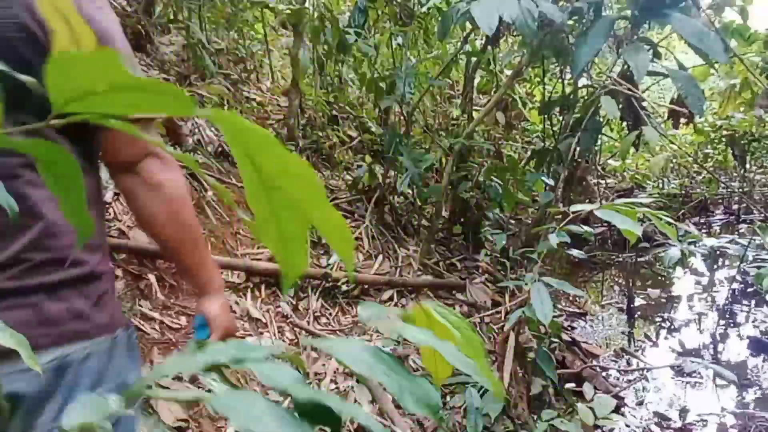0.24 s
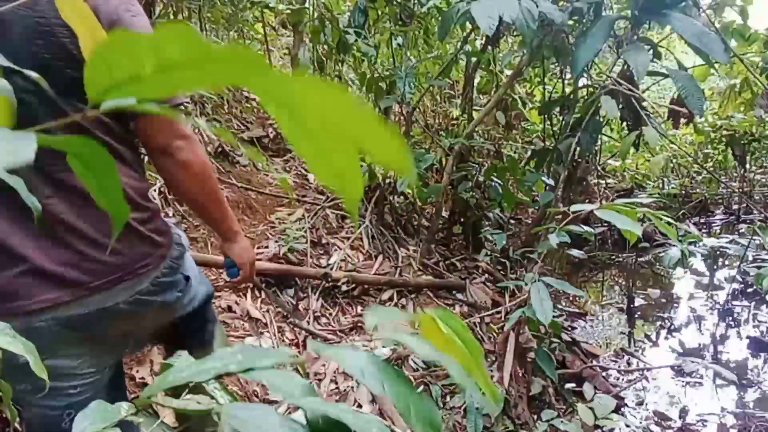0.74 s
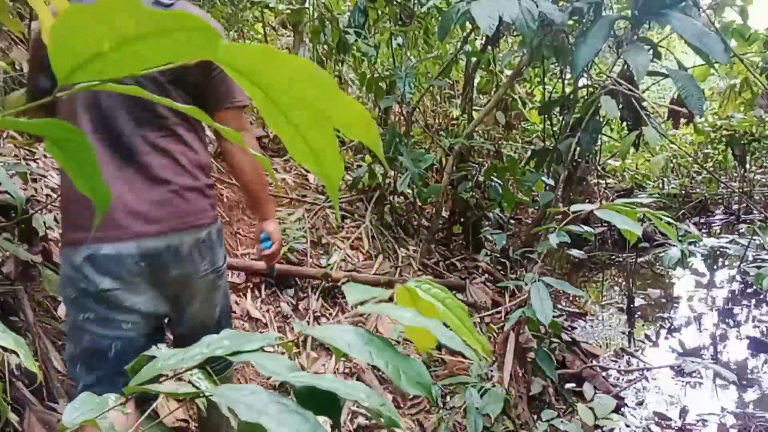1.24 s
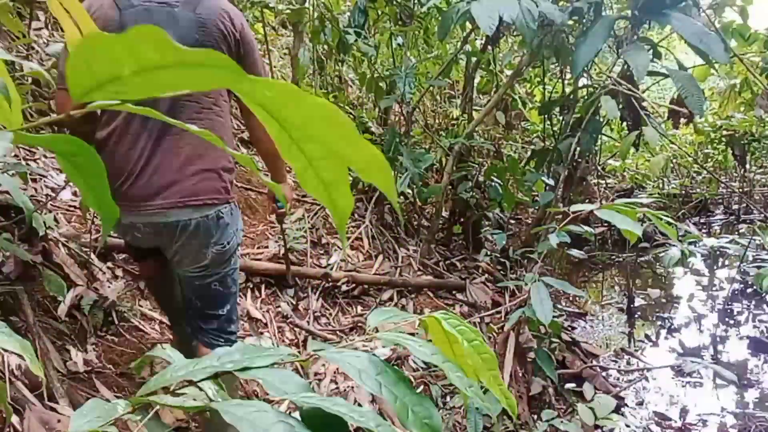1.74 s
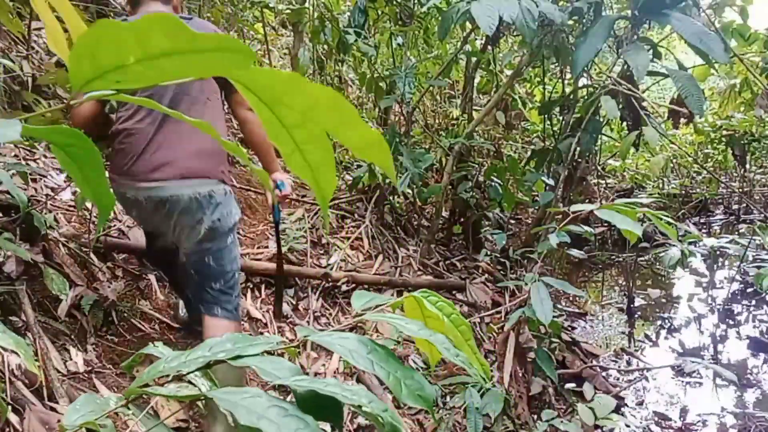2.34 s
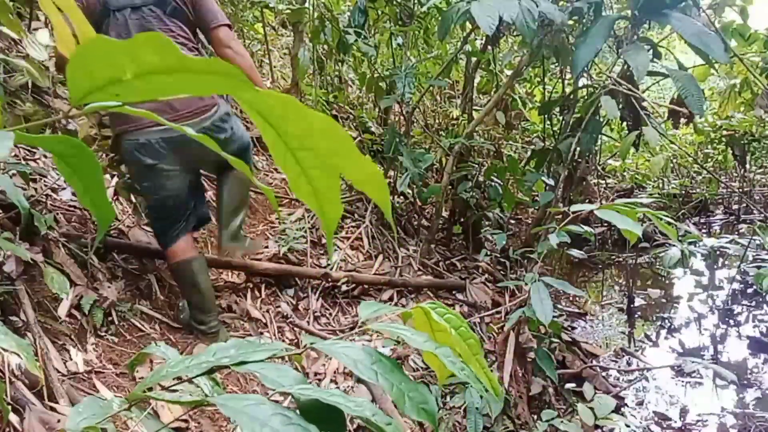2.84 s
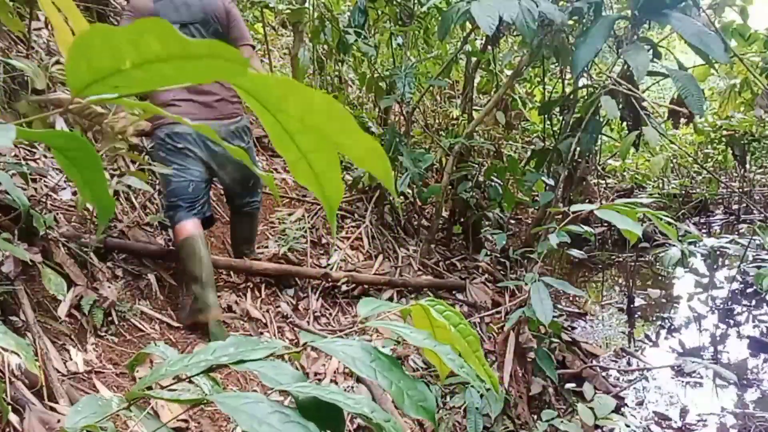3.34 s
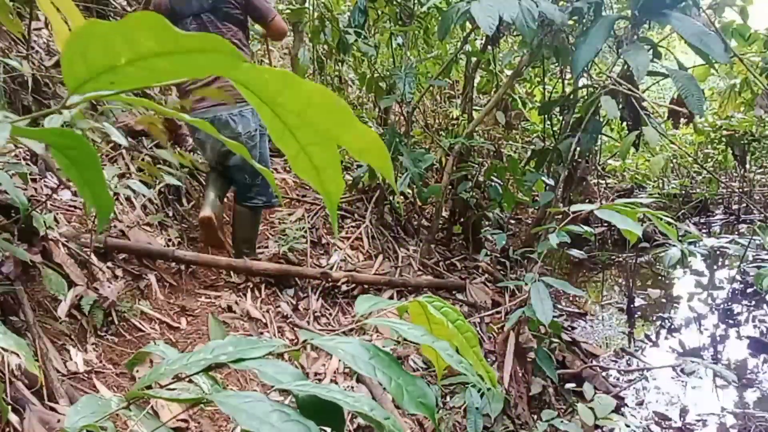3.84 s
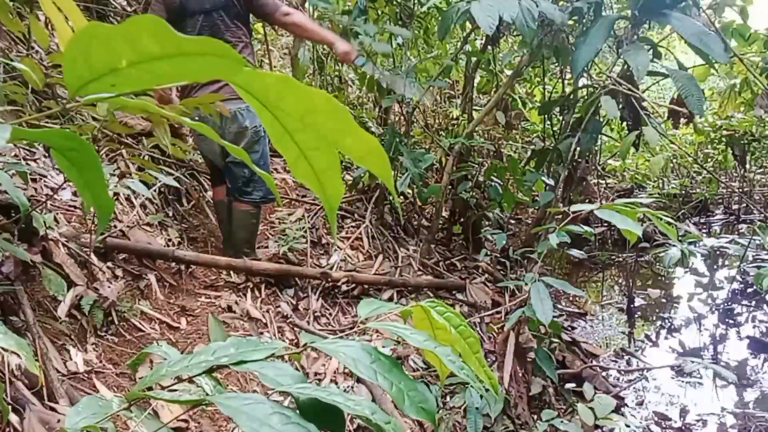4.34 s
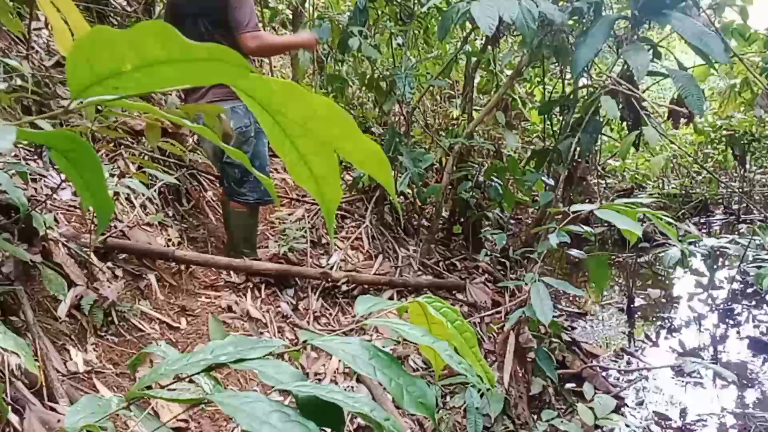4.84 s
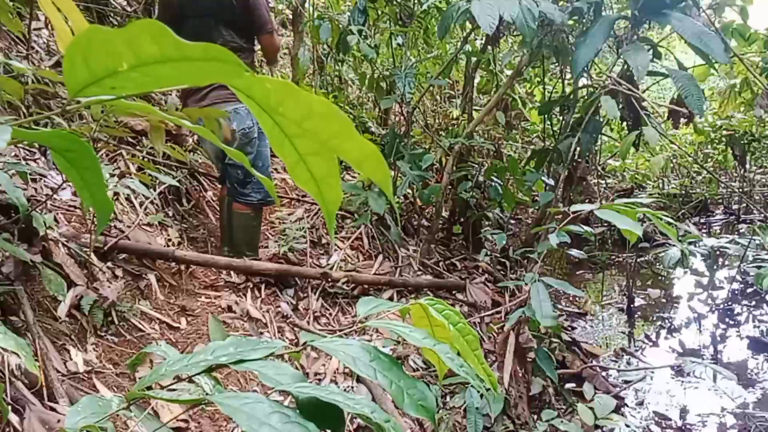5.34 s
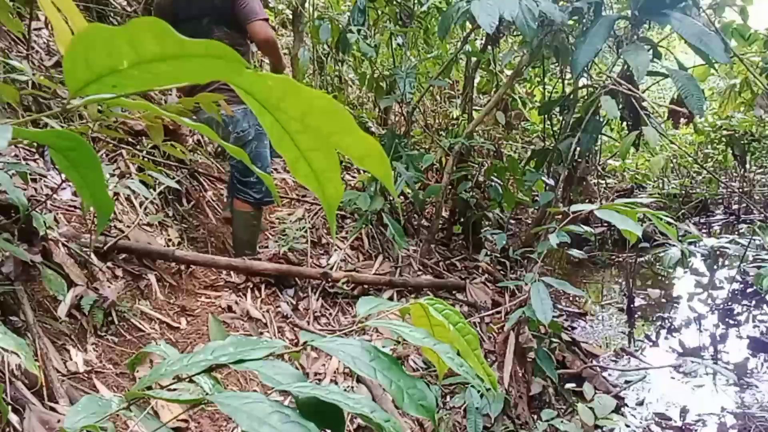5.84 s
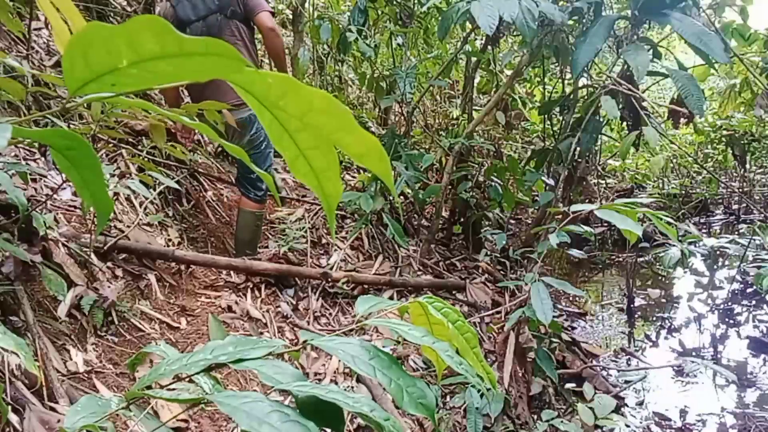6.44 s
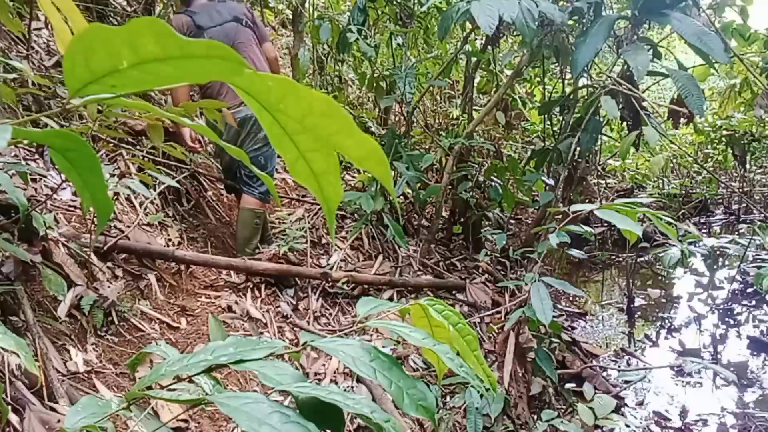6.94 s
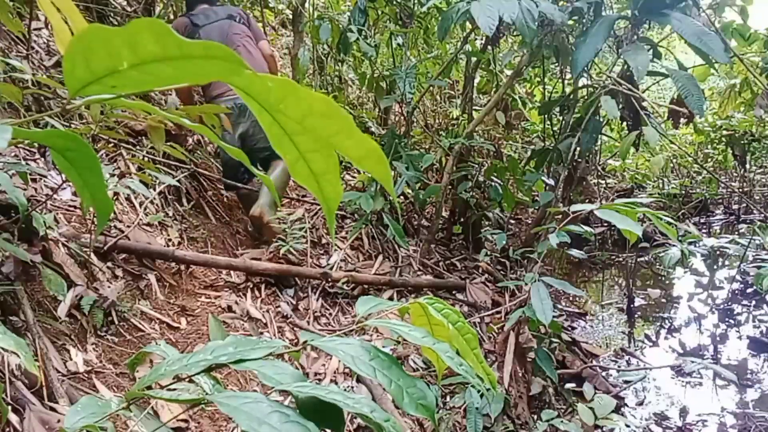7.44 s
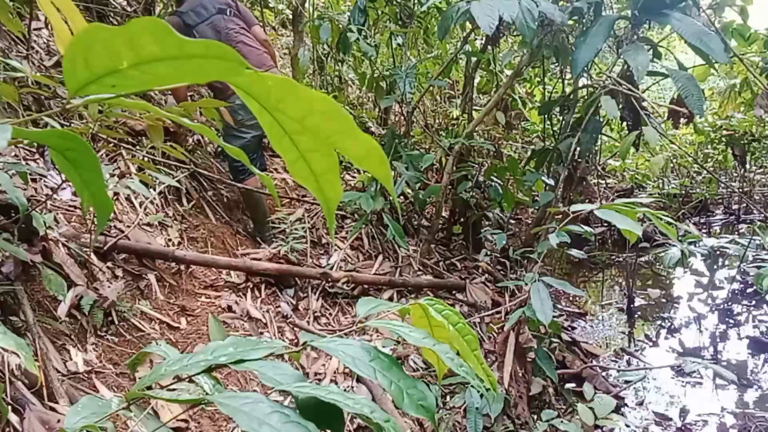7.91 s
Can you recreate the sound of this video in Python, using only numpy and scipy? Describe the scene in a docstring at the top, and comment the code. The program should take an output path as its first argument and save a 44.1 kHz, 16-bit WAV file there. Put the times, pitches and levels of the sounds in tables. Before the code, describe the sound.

Far-off cicadas keep up a high drone in a tropical forest while nearby boots crush dry leaf litter and crack twigs in uneven steps. A long blade tears through the undergrowth twice, first hard, then softer, with a slight echo from the trees. A few more steps crunch as the walker moves away. A dove hoots low and a small bird whistles faintly in the distance.

```python
"""Rainforest floor, one microphone close to a walker in rubber boots who slowly moves off.
Dry leaf litter crackles underfoot, twigs crack and ring, soles thud on damp soil, and a long knife
slashes twice through the brush; the trunks return a faint echo. Far off, over a low wash of air,
a cicada chorus drones near 7.5 kHz, a second insect glides near 5.5 kHz, a dove hoots low
and a small bird whistles twice."""
import sys
import numpy as np
from scipy import signal
from scipy.io import wavfile
from scipy.ndimage import uniform_filter1d

SR = 44100
rng = np.random.default_rng(int(sys.argv[2]) if len(sys.argv) > 2 else 0)


def generate_wav(signal):
    """Clip the signal to [-1, 1] and save it as 16-bit WAV at the path in sys.argv[1]."""
    frames = np.transpose(np.atleast_2d(signal))
    scaled = np.clip(frames, -1, 1) * 32767
    pcm = np.round(scaled).astype(np.int16)
    wavfile.write(sys.argv[1], SR, pcm)


N = 360297
T = np.arange(N) / SR

# Tone of the forest air: frequency_hz, gain_db
AIR_SPECTRUM = [(44, -37.5), (68, 2.5), (123, -0.5), (355, -2.5), (468, -5), (857, -7), (1030, -8.5),
                (4800, -15), (6240, -55.5)]
# Swell of the far cicada chorus: time_s, level_db
CHORUS_LEVELS = [(0.0, -51), (0.34, -56.5), (0.95, -52), (1.21, -57.5), (1.98, -52.5), (4.3, -52.5),
                 (4.46, -50.5), (4.94, -53), (8.17, -54)]
# Tone of that chorus: frequency_hz, gain_db
CHORUS_SPECTRUM = [(3470, -52.5), (5900, -25), (6100, -23), (6450, -19.5), (7160, -4), (7570, 2),
                   (8000, -1), (8570, -14.5), (9490, -19.5), (12300, -53), (13700, -40.5), (14300, -66),
                   (15400, -62)]
# Cicadas nearer the microphone: pitch_hz, width_hz, level_db, swell_rate_hz
NEAR_CICADAS = [(7790, 70, -68, 3.2)]
# Overlapping insect phrases: start_s, end_s, level_db, first_hz, last_hz, width_hz
GLIDE_PHRASES = [(.3, 1.302, -76.5, 5280, 5230, 278), (2.328, 3.03, -69.5, 5070, 5280, 420),
                 (2.97, 3.33, -72.5, 5350, 5430, 300), (6.149, 7.098, -79, 5130, 5250, 200),
                 (7.0, 8.09, -70.5, 5370, 5430, 210), (7.503, 8.087, -70, 5650, 5680, 110),
                 (7.008, 7.259, -72, 9500, 9360, 80)]
# Distant dove: start_s, level_db
DOVE_HOOTS = [(1.67, -78.5), (3.41, -69.5), (5.17, -66), (6.905, -68)]
# Distant small bird: start_s, level_db, pitch_hz, width_hz
BIRD_WHISTLES = [(2.17, -69, 3040, 60), (3.76, -65.5, 2180, 400)]

# Levels of the close sounds below are those ahead of the microphone's colouring.
# Bursts of crushed or brushed leaves: start_s, end_s, dull_db, crisp_db
LEAF_BURSTS = [(0, 0.188, -69.5, -65.5), (0.133, 0.246, -46, -48), (0.317, 0.476, -59, -55),
               (1.022, 1.131, -60, -46), (1.267, 1.399, -63.5, -65), (1.84, 1.925, -73, -54.5),
               (2.282, 2.342, -82, -56.5), (2.817, 2.964, -64.5, -68.5), (3.276, 3.398, -48, -46.5),
               (3.363, 3.52, -57.5, -54), (3.537, 3.738, -65, -59.5), (3.712, 3.873, -65.5, -70.5),
               (3.879, 4.046, -73.5, -62.5), (4.127, 4.162, -55.5, -35.5), (4.767, 4.854, -62, -57.5),
               (4.935, 4.997, -65.5, -50.5), (5.055, 5.176, -58.5, -52), (5.147, 5.443, -60, -57.5),
               (5.676, 5.729, -65, -67), (5.86, 5.962, -79, -63), (6.029, 6.11, -69, -63),
               (6.82, 6.945, -73, -68), (7.281, 7.332, -53.5, -51.5), (7.333, 7.546, -61, -61),
               (7.66, 7.745, -63, -56)]
# Dull crush of packed litter: frequency_hz, gain_db
DULL_SPECTRUM = [(59, -60), (100, -9), (216, -6.5), (446, -5), (3000, -4.5), (3900, -31.5), (6600, -120)]
# Crisp leaf edges: frequency_hz, gain_db
CRISP_SPECTRUM = [(1200, -30.5), (2500, -9), (4000, -4.5), (8000, -4), (14000, -10.5)]
# Breaking twigs: start_s, ring_peak_db, pitch_hz, width_ratio (to pitch), crack_db (against the ring)
TWIG_SNAPS = [(0.112, -49.5, 4700, 0.11, 13.5), (0.15, -33.5, 847, 0.3, -2), (0.167, -35.5, 1710, 0.51, 0),
              (0.191, -36.5, 385, 1.14, -2), (0.337, -31, 1610, 0.65, 4), (0.413, -25, 760, 1.26, -26),
              (0.536, -48.5, 1300, 0.47, -22), (0.597, -42, 1390, 0.24, -7), (0.749, -42, 1820, 0.48, 5.5),
              (1.059, -25.5, 564, 0.52, -19), (1.06, -27.5, 1690, 0.47, -34), (1.101, -39, 1390, 0.32, -14),
              (1.122, -41, 600, 0.57, -20), (1.127, -40, 1330, 0.25, -15), (1.275, -52, 1890, 0.18, -5),
              (1.386, -43, 780, 0.35, -33), (1.583, -49.5, 504, 0.41, -14), (1.63, -52, 1200, 0.33, -16),
              (1.628, -54, 4730, 0.083, 2), (2.365, -41.5, 2150, 0.96, -1), (2.616, -37.5, 580, 0.51, -13),
              (3.261, -44.5, 607, 0.21, -4), (3.302, -22, 544, 0.92, -10), (3.306, -29.5, 1980, 0.24, -20),
              (3.451, -38, 1610, 0.5, 0), (3.554, -33, 5650, 0.24, -18), (3.563, -14.5, 7160, 0.37, -9),
              (3.643, -38.5, 1034, 0.6, -18), (4.133, -33, 1295, 0.19, -19), (4.292, -18.5, 4600, 0.5, 0),
              (4.318, -20.5, 5690, .4, -1), (5.072, -46, 613, 0.12, 13), (5.309, -41, 880, 0.29, -2),
              (5.397, -31.5, 4170, 0.26, -1.5), (5.535, -48, 1750, 0.27, 3), (7.285, -40, 1217, 0.17, -25),
              (7.35, -38.5, 626, 0.32, -20)]
# Modes of a twig, against the first: pitch_ratio, gain_db, width_ratio
TWIG_MODES = [(1, 9, 0.91), (2.0, -3.5, 0.6), (3.2, -17.5, 0.4)]
# Boot on soil: start_s, level_db, pitch_hz
BOOT_THUDS = [(0.146, -46.5, 268), (3.302, -39.5, 240.5), (3.45, -40.5, 218), (4.284, -43, 95)]
# The clearest ticks of stalks: start_s, peak_db, pitch_hz
STALK_TICKS = [(0.268, -55.5, 583), (0.653, -59, 2020), (0.845, -59, 550), (1.208, -56, 1660),
               (1.342, -63, 1640), (1.364, -57, 865), (1.54, -56.5, 840), (1.558, -54, 560),
               (1.712, -60, 1240), (2.339, -61.5, 1720), (2.744, -64, 4080), (3.005, -63.5, 1200),
               (7.351, -41, 1290), (7.414, -59, 970), (7.46, -54, 637)]
# Knife strokes: start_s, deepest_bite_s, level_db
KNIFE_STROKES = [(4.255, 4.296, -18), (5.399, 5.405, -33.5)]
# Brush tearing under the blade: frequency_hz, gain_db
BRUSH_SPECTRUM = [(60, -44), (100, -19), (395, -9.5), (650, -11.5), (1180, -9.5), (4080, -6), (7500, -5),
                  (16000, -12.5)]
# Echo among the trunks: frequency_hz, t60_s
TRUNK_DECAY = [(200, 0.23), (700, 0.45), (1500, 0.55), (4000, 0.66), (9000, 0.24)]
# The microphone's colouring of close sounds: frequency_hz, gain_db
MIC_RESPONSE = [(40, -13.5), (200, -2.5), (400, 1), (7500, 2.5), (8500, 0.5), (10000, -17), (12000, -25),
                (12800, -57), (13700, -30.5), (14600, -58.5)]


def gain_of(db):
    return 10 ** (np.asarray(db) / 20)


def unit_rms(x):
    return x / np.sqrt(np.mean(x ** 2) + 1e-30)


def value_at(points, hz):
    """Reads a table along a logarithmic frequency axis."""
    table_hz, value = np.transpose(points)
    return np.interp(np.log(hz + 1), np.log(table_hz + 1), value)


def gate(start, end, rise_s, fall_s):
    """Envelope from start to end with straight fades."""
    return np.clip(np.minimum((T - start) / rise_s, (end - T) / fall_s), 0, 1)


def coloured(x, spectrum):
    """Causal filter of the given spectrum: the phase follows from the log gain."""
    hz = abs(np.fft.fftfreq(4096, 1 / SR))
    log_gain = np.log(gain_of(np.maximum(value_at(spectrum, hz), -100)))
    taps = np.fft.ifft(np.exp(signal.hilbert(log_gain).conj())).real[:2048]
    return signal.oaconvolve(x, taps)[:len(x)]


def resonate(x, hz, width_hz):
    """A resonance that may move: shifts hz down to zero, smooths, and shifts back."""
    turn = np.exp(2j * np.pi * np.cumsum(hz * np.ones(len(x))) / SR)
    pole = np.exp(-np.pi * width_hz / SR)
    return 2 * (turn * signal.lfilter([1 - pole], [1, -pole], x / turn)).real


def band(x, hz, width_hz):
    """Two passes through one resonance, at rms 1."""
    return unit_rms(resonate(resonate(x, hz, width_hz), hz, width_hz))


def wander(rate_hz):
    """Smooth random drift of rms 1."""
    feedback = [1, -np.exp(-np.pi * rate_hz / SR)]
    drift = signal.lfilter([1], feedback, rng.standard_normal(N))
    return unit_rms(signal.lfilter([1], feedback, drift))


def hiss(spectrum, patchy_db):
    """Shaped noise with louder and softer patches in time and frequency."""
    frames, hz = N // 256 + 5, np.fft.rfftfreq(1024, 1 / SR)
    real, imag, patches = rng.standard_normal((frames, 513, 3)).T
    patches = unit_rms(uniform_filter1d(uniform_filter1d(patches, size=10, axis=0), size=12, axis=1))
    bins = (real + 1j * imag) * gain_of(value_at(spectrum, hz)[:, None] + patchy_db * patches)
    return unit_rms(signal.istft(bins, nperseg=1024, noverlap=768)[1][:N])


def crackle(per_s, spread_db, clump_db):
    """Clumped clicks of random sign; a few are large."""
    clicks = (rng.random(N) < per_s / SR) * rng.choice([-1., 1.], N)
    size = np.minimum(rng.exponential(1, N), 5)
    return clicks * gain_of(spread_db * size + clump_db * wander(29))


def forest_air():
    """A faint, low wash all around the microphone, its level wavering slightly."""
    return gain_of(-74.5 + 0.71 * wander(5.6)) * hiss(AIR_SPECTRUM, patchy_db=1.7)


def cicadas():
    """Many far cicadas blur into a band of hiss; a nearer one is a fuzzy whistle that comes and goes."""
    chorus_db = np.interp(T, *np.transpose(CHORUS_LEVELS)) + 1.6 * wander(2.4)
    out = gain_of(chorus_db) * hiss(CHORUS_SPECTRUM, patchy_db=2.0)
    for hz, width_hz, db, swell_hz in NEAR_CICADAS:
        whistle = band(rng.standard_normal(N), hz, width_hz)
        out += gain_of(db + 8.2 * np.minimum(wander(swell_hz), 1.2)) * whistle
    return out


def leaf_litter(walk_off_db_per_s=-2, shed_db_per_s=-94.5, burst_sag=0.38):
    """Close by, leaves break as dense clicks: dull from packed litter, crisp from the edges."""
    # leaves stir all along, fainter as the walker moves off
    dull, crisp = gain_of(-73 + walk_off_db_per_s * T), gain_of(-71 + walk_off_db_per_s * T)
    for start, bite, db in KNIFE_STROKES:  # cut leaves rain down after each stroke
        shed = gain_of(db - 15 + shed_db_per_s * np.maximum(T - bite, 0))
        crisp += shed * gate(start, N / SR, bite - start, 0.01)
    for start, end, dull_db, crisp_db in LEAF_BURSTS:
        progress = np.clip((T - start) / (end - start), 0, 1)
        burst = gate(start, end, 0.028, 0.062) * (1 - burst_sag * progress)
        dull += gain_of(dull_db) * burst
        crisp += gain_of(crisp_db) * burst
    dull_clicks = coloured(crackle(per_s=5000, spread_db=3.4, clump_db=5.0), DULL_SPECTRUM)
    # hollows in the litter make passing bands of the crush stand out
    hollows = sum(resonate(dull_clicks, hz * gain_of(0.62 * wander(6)), width_hz=240)
                  for hz in np.geomspace(650, 1900, num=4))
    crisp_clicks = coloured(crackle(per_s=3000, spread_db=3.3, clump_db=3.16), CRISP_SPECTRUM)
    # curled leaves do the same for the crisp edges
    curls = sum(resonate(crisp_clicks, hz * gain_of(1.4 * wander(9)), width_hz=220)
                for hz in np.geomspace(2800, 6100, num=4))
    crush = unit_rms(dull_clicks + 1.8 * hollows) + gain_of(-9) * stalk_patter()
    return dull * crush + crisp * unit_rms(crisp_clicks + 1.6 * curls)


def stalk_tick(hz, rise_s=0.002):
    """A bit of stalk rings briefly with a soft start, peak about 1."""
    t = np.arange(1500) / SR
    return t / rise_s * np.exp(1 - t / rise_s) * np.sin(2 * np.pi * hz * t)


def stalk_patter(per_s=70):
    """Sparse dry ticks in the litter, each from one of ten small stalks."""
    size = gain_of(3.0 * np.minimum(rng.exponential(1, N), 3))
    hits = size * (rng.random(N) < per_s / SR)
    stalk, out = rng.integers(0, 10, N), np.zeros(N)
    for k, hz in enumerate(np.geomspace(550, 4200, num=10)):
        out += signal.oaconvolve(hits * (stalk == k), stalk_tick(hz))[:N] / hz ** 0.12
    return unit_rms(out)


def trunk_echo(x):
    """Trunks return echoes of random sign, one in every 20 samples, each band dying at its own speed."""
    taps, slots = np.zeros(SR), np.arange(500, SR - 20, 20)
    taps[slots + rng.integers(0, 20, len(slots))] = rng.choice([-1., 1.], len(slots))
    hz, t, bins = signal.stft(taps, SR, nperseg=256)
    decay = gain_of(-60 * t / value_at(TRUNK_DECAY, hz)[:, None])
    tail = signal.istft(bins * decay, SR, nperseg=256)[1]
    return signal.fftconvolve(x, tail / np.linalg.norm(tail))[:N]


def twig_snaps(splinter_t60_s=0.099, crack_t60_s=0.0051):
    """Each twig gives a sharp crack, splinters, and a short woody ring with up to two overtones."""
    out, t = np.zeros(N + 6000), np.arange(6000) / SR
    for start, db, hz, width_ratio, crack_db in TWIG_SNAPS:
        ring_noise, crack_noise = rng.standard_normal((2, len(t)))
        shortening = max(1 - 0.41 * width_ratio, 0.2)  # wide-ringing twigs splinter more briefly
        splinters = gain_of(-60 * t / (splinter_t60_s * shortening))
        blow = ring_noise * splinters + 10.7 * (t == 0)
        ring = sum(gain_of(mode_db) * band(blow, hz * multiple, mode_width * width_ratio * hz)
                   for multiple, mode_db, mode_width in TWIG_MODES if hz * multiple < 9000)
        crack_shape = gain_of(-60 * t / crack_t60_s) + 0.33 * splinters
        crack = resonate(crack_noise * crack_shape, hz=3200, width_hz=6000)
        snap = ring / abs(ring).max() + gain_of(crack_db) * crack / abs(crack).max()
        at = round(start * SR)
        out[at:at + len(t)] += gain_of(db) * snap
    return out[:N]


def boot_thuds(rise_s=0.001, t60_s=0.12):
    """Damp soil under a rubber sole answers with a few low cycles."""
    out = np.zeros(N)
    for start, db, hz in BOOT_THUDS:
        since = np.maximum(T - start, 0)
        envelope = gain_of(db - 60 * since / t60_s) * (1 - np.exp(-since / rise_s))
        out += envelope * np.sin(2 * np.pi * hz * since)
    return out


def clear_ticks():
    """Single stalks tick clear of the litter between the steps."""
    out = np.zeros(N + SR)
    for start, db, hz in STALK_TICKS:
        tick = gain_of(db) * stalk_tick(hz)
        out[round(start * SR):][:len(tick)] += tick
    return out[:N]


def gliding_insects():
    """Each phrase is a narrow, fluttering band of noise that slides in pitch."""
    out = np.zeros(N)
    for start, end, db, first_hz, last_hz, width_hz in GLIDE_PHRASES:
        hz = np.interp(T, [start, end], [first_hz, last_hz]) + 40 * wander(8)
        glide = band(rng.standard_normal(N), hz, width_hz)
        flutter_db = 3.6 * np.minimum(wander(14), 1.3)
        out += gain_of(db + flutter_db) * gate(start, end, 0.024, 0.022) * glide
    return out


def dove(pitch_hz=385, hoot_s=0.427):
    """A distant dove holds a pure low note with soft ends and a slight tremble."""
    hoots = sum(gain_of(db) * gate(start, start + hoot_s, 0.041, 0.076) for start, db in DOVE_HOOTS)
    return hoots * gain_of(1.3 * wander(60)) * np.sqrt(2) * np.sin(2 * np.pi * pitch_hz * T)


def small_bird(whistle_s=0.13):
    """A bird whistles far away, its notes smeared by the trees into bands of noise."""
    breath = rng.standard_normal(N)
    return sum(gain_of(db) * gate(start, start + whistle_s, 0.03, 0.064) * band(breath, hz, width_hz)
               for start, db, hz, width_hz in BIRD_WHISTLES)


def knife_slashes(touch_s=0.003, dig_db_per_s=481, hold_s=0.014, release_db_per_s=-300):
    """The blade meets the outer leaves, then digs in and tears many stems at once: a dense crackle."""
    force = np.zeros(N)
    for start, bite, db in KNIFE_STROKES:
        touch = start + min(touch_s, (bite - start) / 2)
        times_s = [start, touch, bite, bite + hold_s, bite + hold_s + 1]
        shape_db = [-35, -dig_db_per_s * (bite - touch), 0, -3.0, release_db_per_s]
        force += gain_of(db + np.interp(T, times_s, shape_db, left=-200))
    tearing = coloured(crackle(per_s=13000, spread_db=2.6, clump_db=2.4), BRUSH_SPECTRUM)
    return force * unit_rms(tearing)


def scene():
    """Feet and blade near the microphone with their echo, the forest behind them; mono."""
    feet = leaf_litter() + twig_snaps() + clear_ticks() + boot_thuds()
    blade = knife_slashes()
    near = feet + blade + trunk_echo(gain_of(-22) * feet + gain_of(-14.5) * blade)
    far = forest_air() + cicadas() + gliding_insects() + dove() + small_bird()
    return (coloured(near, MIC_RESPONSE) + far)[None]


def record(dry):
    """The recorder cuts off the treble above 15.5 kHz."""
    lowpass = signal.firwin(511, 15500, window=("kaiser", 9), fs=SR)
    return signal.oaconvolve(dry, lowpass[None], "same")


dry = scene()
out = record(dry)
generate_wav(out)
```